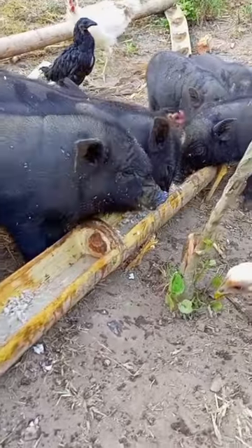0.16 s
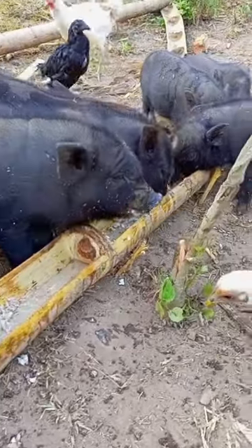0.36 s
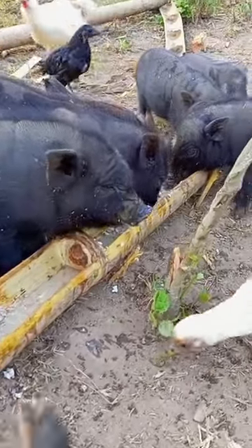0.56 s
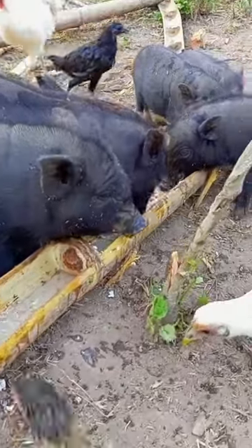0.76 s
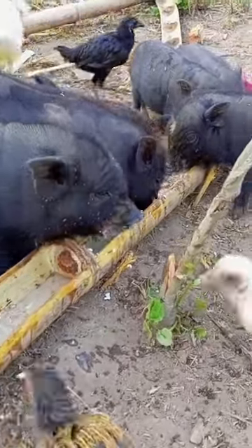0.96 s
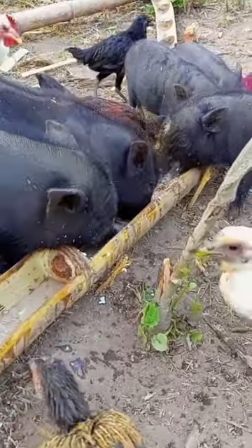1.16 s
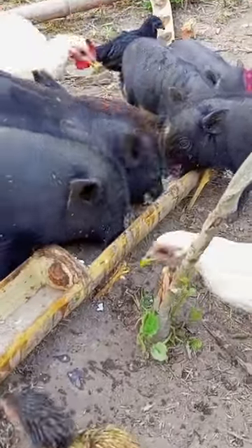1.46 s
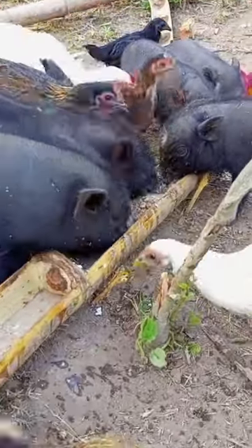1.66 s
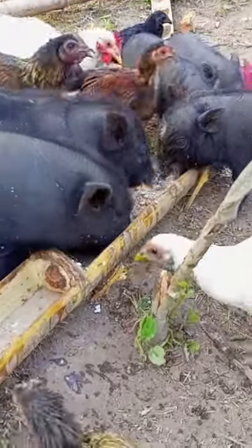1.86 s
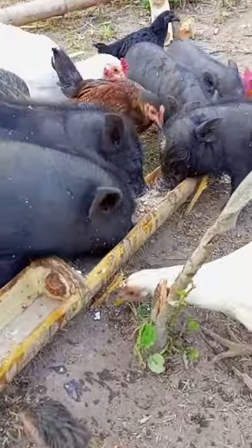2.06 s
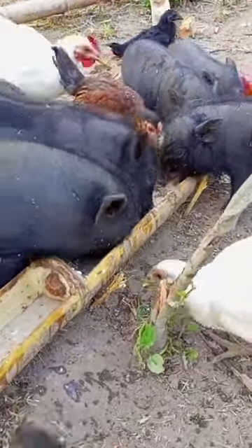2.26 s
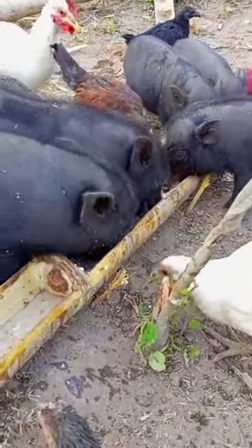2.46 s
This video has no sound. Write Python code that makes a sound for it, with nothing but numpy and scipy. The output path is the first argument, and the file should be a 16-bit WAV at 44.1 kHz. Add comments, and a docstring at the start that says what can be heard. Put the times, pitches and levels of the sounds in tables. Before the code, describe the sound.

Piglets chew wet feed close by in an open farmyard, with crisp lip smacks, squelches and small plops throughout. The sound dips briefly at 0.3 seconds. Snouts bump the bamboo trough now and then from 0.4 seconds, over a faint rumble. Hens call softly around 0.9 to 1.2 seconds. A soft grunt and snuffle come at 1.6, another snuffle at 2.2, and two faint distant tones near the end.

```python
"""Piglets eat wet feed from a bamboo trough in an open farmyard, a metre or two from the microphone.
Rustling and nibbling run throughout. Lips smack from the start, each smack a cluster of tiny bursting
films that ring the mouth and spray treble; tongues squelch and air pockets plop. The level dips briefly,
then snouts bump the trough and the sharpest smacks click over a faint rumble. Hens call softly; past
halfway come a grunt and two snuffles, and two faint tones carry from far off near the end."""
import sys
import numpy as np
from scipy import signal
from scipy.fft import rfft, irfft
from scipy.io import wavfile
from scipy.ndimage import uniform_filter1d

SR = 44100
rng = np.random.default_rng(int(sys.argv[2]) if len(sys.argv) > 2 else 0)


def unload_audio(sound):
    """Save the sound as a 16-bit wav file, at the path given as the first command line argument."""
    columns = np.transpose(np.atleast_2d(sound))
    # keep every value between -1 and 1, then stretch to whole-number steps
    steps = np.round(np.clip(columns, -1, 1) * 32767)
    wavfile.write(sys.argv[1], SR, steps.astype(np.int16))


N = 114660
T = np.arange(N) / SR
FILMS_PER_S = 2500  # wet films bursting in a mouthful

# Spectrum of spray and breath leaving a snout. Each row: frequency in Hz, relative level in dB.
SPRAY_COLOUR = [(900, -21.5), (2500, 7), (5000, 2), (10000, 4.5), (12000, -8), (15500, -20)]


def amp(db):
    """Decibels to gain."""
    return 10 ** (np.asarray(db) / 20)


def unit(x):
    """Scale to rms 1."""
    return x / np.sqrt(np.mean(x ** 2) + 1e-20)


def resonate(x, hz, q):
    """One resonance, gain 1 at its centre."""
    return signal.lfilter(*signal.iirpeak(min(hz, SR / 4), max(q, .5), fs=SR), x)


def colour(x, outline):
    """Minimum-phase filter with a (Hz, dB) outline, falling away below its first point."""
    hz, db = np.array(outline, float).T
    f = np.maximum(np.fft.rfftfreq(4096, 1 / SR), 1)
    octaves_below = np.maximum(np.log2(hz[0] / f), 0)
    gain_db = np.interp(np.log(f), np.log(hz), db) - 7.8 * octaves_below
    cepstrum = irfft(np.log(amp(gain_db)))
    half = len(cepstrum) // 2
    cepstrum[1:half] *= 2
    cepstrum[half + 1:] = 0
    return signal.fftconvolve(x, irfft(np.exp(rfft(cepstrum))))[:len(x)]


def walk(per_s):
    """Smooth random wander with a spread near 1."""
    return np.interp(T * per_s, np.arange(2000), rng.standard_normal(2000))


def gate(start, end, edge_s):
    """Fade in, hold, fade out."""
    return np.clip((T - start) / edge_s, 0, 1) * np.clip((end - T) / edge_s, 0, 1)


def fader(levels):
    """Gain that follows (seconds, dB) points."""
    return amp(np.interp(T, *np.array(levels).T))


def burst(length, per_s, spread_db=2):
    """Uneven clicks and a little noise swell and die away; returns them and their peak time."""
    peak = 2 * length
    t = np.arange(int(.25 * SR)) / SR - peak
    swell = np.exp(np.where(t < 0, -(t / (.55 * length)) ** 2, -t / (.5 * length)))
    chance, size, polarity = rng.random((3, len(t)))
    strength = amp(spread_db * np.minimum(-np.log(1 - size), 4))
    clicks = (chance < per_s / SR) * np.sign(polarity - .5) * strength
    return swell * (unit(clicks) + .34 * rng.standard_normal(len(t))), peak


def add(out, x, start, length, db):
    """Mix in a sound with the energy of level db held for its length."""
    i = max(int(start * SR), 0)
    x = x * amp(db) * np.sqrt(length * SR / (np.sum(x ** 2) + 1e-20))
    out[i:i + len(x)] += x[:max(N - i, 0)]


def hollow(events, q, skirt_q, lead_s, boost_db):
    """Soft pushes that each ring a damped hollow."""
    out = np.zeros(N)
    for at, length, hz, db in events:
        push, peak = burst(length, FILMS_PER_S)
        ring = resonate(push, hz, q)
        ring = resonate(resonate(ring, hz, skirt_q), hz, skirt_q)
        add(out, ring, at - peak - lead_s, length, db + boost_db)
    return out


def rooting(flutter_db=3):
    """Snouts and feet rustle low down and the mash slops above them, each fluttering in level."""
    # How loud the rustle and the slop are. Each row: time in seconds, level in dB.
    rustle_levels = [(0, -63.5), (.08, -67.5), (.2, -85), (.41, -84), (.46, -57.5), (.6, -81), (.66, -61.5),
                     (.79, -57), (.98, -67), (1.1, -63.5), (1.23, -68.5), (1.34, -79), (1.39, -66),
                     (1.6, -59), (1.78, -66), (1.85, -74), (1.9, -61.5), (2.0, -105), (2.07, -78),
                     (2.12, -61), (2.25, -57.5), (2.3, -75.5), (2.6, -80)]
    slop_levels = [(0, -74.5), (.2, -66), (.33, -75.5), (.45, -64), (.59, -86), (.68, -57.5), (.8, -68),
                   (1.02, -62.5), (1.11, -66.5), (1.21, -58), (1.33, -81), (1.39, -68.5), (1.6, -67),
                   (1.69, -58.5), (1.78, -63), (1.85, -76.5), (1.93, -64.5), (2.06, -79), (2.13, -57.5),
                   (2.29, -76), (2.36, -65), (2.6, -73.5)]
    # Their spectra. Each row: frequency in Hz, relative level in dB.
    rustle_colour = [(60, -9.5), (150, 2.5), (370, 7), (520, -2.5), (1000, -18)]
    slop_colour = [(250, -21.5), (450, -6.5), (650, 4.5), (1100, 9), (1600, -1), (3500, -21)]
    out = np.zeros(N)
    for levels, outline in ((rustle_levels, rustle_colour), (slop_levels, slop_colour)):
        noise = rng.standard_normal(N) * amp(flutter_db * walk(44.99))
        out += unit(colour(noise, outline)) * fader(levels)
    return out


def chewing(nibbles_per_s=95, nibble_s=.007, centre_hz=4000, spread_db=3.5, flutter_db=2, hiss_db=-3):
    """Quieter mouths: tiny wet nibbles, each with its own resonance, over a soft hiss."""
    # How loud the chewing is. Each row: time in seconds, level in dB.
    levels = [(0, -53), (.45, -55.5), (.58, -60.5), (.7, -55), (1.25, -57), (1.82, -53), (1.86, -61),
              (1.98, -53), (2.35, -54.5), (2.6, -58)]
    # Its spectrum. Each row: frequency in Hz, relative level in dB.
    outline = [(850, -38), (1250, -1), (2000, -2), (3100, 7), (4800, -3), (10000, 2.5), (12000, -5),
               (15500, -31)]
    nibbles = np.zeros(N)
    for at in np.arange(0, N / SR, 1 / nibbles_per_s):
        pitch, size, shift = np.clip(rng.standard_normal(3), -2, 2)
        films, _ = burst(nibble_s, 2 * FILMS_PER_S)
        wet = resonate(films, centre_hz * 2 ** (.75 * pitch), q=5)
        add(nibbles, wet, at + shift / nibbles_per_s, nibble_s, spread_db * size)
    hiss = unit(rng.standard_normal(N) * amp(flutter_db * walk(50)))
    mouths = unit(nibbles) + amp(hiss_db) * hiss
    return unit(colour(mouths, outline)) * fader(levels)


def smacks(open_q=1.9, open_db=-7.5, lead_s=.0005, mist_db=8.5, tint_db=13, spray_hz=(4500, 11000)):
    """Wet films burst between the lips: the mouth rings and a spray of sharp clicks escapes."""
    # Lip smacks. Each row: peak time and length in seconds, mouth resonance in Hz,
    # ring level and spray level in dB.
    lip_smacks = [(0.036, 0.0023, 3440, -42, -43.5), (0.118, 0.0045, 2460, -41, -52),
                  (0.137, 0.003, 3460, -34, -51.5), (0.234, 0.0016, 2450, -55.5, -49.5),
                  (0.257, 0.0076, 3300, -52.5, -58), (0.313, 0.0074, 3460, -42.5, -54),
                  (0.3524, 0.0016, 3280, -43, -50), (0.3616, 0.0046, 3250, -33, -44),
                  (0.384, 0.0098, 3080, -52, -52.5), (0.4054, 0.001, 3000, -40.5, -51),
                  (0.4375, 0.0075, 3660, -46.5, -58), (0.44, 0.0079, 2900, -46, -49.5),
                  (0.4648, 0.0031, 3130, -53, -38), (0.472, 0.0057, 3180, -35.5, -49.5),
                  (0.546, 0.0016, 3100, -47, -54), (0.5957, 0.0022, 4600, -76, -39.5),
                  (0.616, 0.005, 3000, -41.5, -44), (0.628, 0.008, 3060, -38.5, -45.5),
                  (0.656, 0.01, 2540, -43, -51), (0.694, 0.017, 3070, -46, -51.5),
                  (0.747, 0.0047, 3400, -41, -62), (0.756, 0.0087, 3240, -38, -46.5),
                  (0.768, 0.0092, 2630, -49, -54), (0.7917, 0.004, 3290, -31, -43),
                  (0.828, 0.0027, 5700, -34, -45), (0.832, 0.0068, 3200, -39, -42),
                  (0.84, 0.0042, 3430, -53, -31), (0.859, 0.0025, 3450, -38.5, -67),
                  (0.942, 0.008, 3600, -43, -78), (0.983, 0.011, 2870, -80, -46.5),
                  (1.0102, 0.0048, 3150, -44, -49), (1.03, 0.016, 3330, -41, -50),
                  (1.054, 0.0026, 3700, -47, -48), (1.069, 0.0024, 3180, -42, -53),
                  (1.0801, 0.0028, 3140, -31, -45.5), (1.0904, 0.0051, 2500, -40, -48.5),
                  (1.117, 0.0076, 3060, -56, -44.5), (1.141, 0.0041, 3000, -33.5, -47.5),
                  (1.1442, 0.0038, 3300, -33.5, -57), (1.231, 0.0042, 3320, -54, -49),
                  (1.369, 0.0089, 2160, -46, -41), (1.377, 0.0021, 3600, -33.5, -49),
                  (1.384, 0.0051, 2650, -41, -46.5), (1.4557, 0.0026, 2800, -41.5, -46),
                  (1.463, 0.0048, 3330, -41.5, -44.5), (1.4705, 0.0038, 2870, -35.5, -42),
                  (1.5265, 0.0035, 2245, -42.5, -79), (1.661, 0.0062, 2370, -44, -54),
                  (1.67, 0.008, 2920, -42, -47.5), (1.7174, 0.0018, 2780, -33, -40),
                  (1.758, 0.0064, 1950, -35, -49), (1.78, 0.0098, 4200, -63, -36.5),
                  (1.905, 0.006, 3085, -36.5, -40.5), (1.977, 0.012, 4200, -50, -52),
                  (2.092, 0.0026, 2570, -36.5, -40.5), (2.0983, 0.0024, 2570, -30.5, -38),
                  (2.107, 0.0074, 3070, -41, -47), (2.245, 0.0067, 2960, -43, -50),
                  (2.3144, 0.0039, 2880, -30.5, -68), (2.3163, 0.0027, 3430, -28.5, -69),
                  (2.323, 0.0096, 2720, -35, -47.5), (2.338, 0.026, 3340, -45.5, -46.5),
                  (2.4024, 0.0035, 3920, -37.5, -49.5), (2.433, 0.0088, 2680, -46, -41.5),
                  (2.597, 0.0056, 3000, -40.5, -46)]
    out = np.zeros(N)
    for at, length, hz, ring_db, spray_db in lip_smacks:
        films, peak = burst(length, FILMS_PER_S)
        open_mouth = resonate(resonate(films, hz, open_q), hz, open_q)
        ring = unit(resonate(open_mouth, hz, q=4.2)) + amp(open_db) * unit(open_mouth)
        add(out, ring, at - peak - lead_s, length, ring_db)
        envelope = np.sqrt(np.abs(uniform_filter1d(films ** 2, size=60)))
        mist = envelope * rng.standard_normal(len(films))
        # Every smack sprays with its own colour and two treble rings.
        tinted = [(f, db + tint_db * rng.uniform(-1.64, 1)) for f, db in SPRAY_COLOUR]
        drops = unit(films) + amp(mist_db) * unit(mist)
        treble_rings = sum(unit(resonate(drops, rng.uniform(*spray_hz), q=7)) for _ in range(2))
        spray = colour(unit(drops) + treble_rings / 2, tinted)
        add(out, spray, at - peak, length, spray_db)
    return out


def squelches():
    """Tongues press the mash and sound a broad, damped cavity."""
    # Each row: peak time and length in seconds, cavity pitch in Hz, level in dB before the boost.
    tongue_presses = [(0.1325, 0.0036, 840, -46.5), (0.6275, 0.0047, 836, -40), (0.701, 0.006, 1040, -48.5),
                      (0.77, 0.0069, 764, -46), (0.792, 0.0049, 1230, -48), (0.835, 0.011, 850, -46),
                      (1.072, 0.01, 790, -46.5), (1.187, 0.018, 490, -50), (1.375, 0.023, 670, -55.5),
                      (1.463, 0.018, 740, -54.5), (1.668, 0.022, 860, -53.5), (1.88, 0.0061, 880, -51.5),
                      (1.973, 0.014, 1240, -54), (2.108, 0.0062, 870, -44.5), (2.215, 0.011, 705, -51),
                      (2.326, 0.012, 730, -45.5)]
    return hollow(tongue_presses, q=.75, skirt_q=.71, lead_s=.00141, boost_db=2)


def plops():
    """Air pockets plop in the mash with a clear ring."""
    # Each row: peak time and length in seconds, pitch in Hz, level in dB before the boost.
    air_pockets = [(0.148, 0.0068, 1400, -53), (1.136, 0.0041, 1360, -53), (1.284, 0.0096, 865, -59.5),
                   (1.733, 0.011, 1450, -53.5), (1.744, 0.0074, 1400, -47), (1.905, 0.007, 910, -55.5),
                   (2.326, 0.0094, 915, -42), (2.438, 0.0073, 1220, -57.5), (2.494, 0.0078, 1410, -61)]
    return hollow(air_pockets, q=12.2, skirt_q=.5, lead_s=.00196, boost_db=5)


def rumble(hz=134, q=2.06, db=-74, fade_in_s=.3):
    """A low outdoor rumble fades in and stays."""
    low = resonate(resonate(rng.standard_normal(N), hz, q), hz, q)
    return unit(low) * amp(db) * np.minimum(T / fade_in_s, 1) ** 4


def bumps(top_hz=550):
    """Snouts and feet knock the trough, which answers with a dull thud."""
    # Each row: peak time and length in seconds, pitch in Hz, level in dB before boost and low-pass.
    knocks = [(0.4305, 0.0045, 278, -44), (0.443, 0.011, 304, -58), (0.49, 0.021, 162, -61),
              (0.755, 0.032, 340, -55), (0.795, 0.019, 360, -55), (1.075, 0.02, 90.5, -65.5),
              (1.08, 0.022, 280, -58.5), (1.781, 0.015, 243, -60.5)]
    thuds = hollow(knocks, q=.59, skirt_q=.73, lead_s=.0024, boost_db=5)
    return signal.sosfilt(signal.butter(4, TOP := top_hz, fs=SR, output="sos"), thuds)


def smack_top_clicks():
    """Crisp, very high clicks on top of the sharpest lip smacks."""
    # Each row: peak time and length in seconds, level in dB.
    sharp_smacks = [(0.624, 0.0032, -49), (0.771, 0.011, -54.5), (0.834, 0.019, -59), (1.024, 0.0052, -52),
                    (1.232, .002, -46), (1.972, 0.0051, -42.5)]
    # Spectrum of the clicks. Each row: frequency in Hz, relative level in dB.
    outline = [(5000, -29), (11500, 6), (15500, 1)]
    out = np.zeros(N)
    for at, length, db in sharp_smacks:
        clicks, peak = burst(length, FILMS_PER_S / 2)
        add(out, colour(clicks, outline), at - peak, length, db)
    return out


def hens(octave_db=-1, waver=.06, rough_db=4):
    """Hens call faintly: short, rough notes with their octave, scooping up, then holding or falling."""
    # Each row: start and end in seconds, first and last pitch of the glide in Hz, level in dB.
    calls = [(0.853, 0.91, 944, 944, -56), (0.901, 1.059, 425, 282, -58.5), (1.153, 1.181, 693, 630, -49),
             (1.182, 1.247, 419, 327, -57)]
    out = np.zeros(N)
    for start, end, first_hz, last_hz, db in calls:
        along = np.clip((T - start) / (end - start), 0, 1)
        scoop = 1 - .1 * np.exp(-along / .12)
        hz = (first_hz + (last_hz - first_hz) * along) * scoop
        phase = 2 * np.pi * np.cumsum(hz * (1 + waver * walk(200))) / SR
        note = (np.sin(phase) + amp(octave_db) * np.sin(2 * phase)) * amp(rough_db * walk(160))
        out += unit(note) * gate(start, end, (end - start) / 5) * amp(db)
    return out


def grunt(pulse_hz=79, throat_hz=110, chest_hz=300, db=-58):
    """A soft closed-mouth grunt: uneven slow pulses, muffled by throat and chest."""
    cycles = np.cumsum(pulse_hz * (1 + .0395 * walk(80))) / SR
    pulses = np.diff(np.floor(cycles), prepend=0)
    voice = resonate(resonate(pulses, throat_hz, q=1), chest_hz, q=.5)
    return unit(voice) * gate(start=1.55, end=1.655, edge_s=.038) * amp(db)


def snuffles():
    """Air hisses through a piglet's snout in the feed."""
    # Each row: start and end in seconds, centre of the hiss in Hz, level in dB.
    breaths = [(1.565, 1.699, 10700, -57), (2.111, 2.249, 4850, -49.5)]
    out = np.zeros(N)
    for start, end, hz, db in breaths:
        hiss = colour(resonate(rng.standard_normal(N), hz, q=4.8), SPRAY_COLOUR)
        out += unit(hiss) * gate(start, end, edge_s=.013) * amp(db)
    return out


def far_tones():
    """Faint, nearly steady tones carry from far off."""
    # Each row: start and end in seconds, pitch in Hz, level in dB.
    tones = [(1.96, 2.523, 1528, -72.5), (2.25, 2.587, 1216, -80)]
    return sum(unit(np.sin(2 * np.pi * hz * T + walk(17))) * gate(start, end, edge_s=.035) * amp(db)
               for start, end, hz, db in tones)


def yard(x, t60_s=.062, scatter_db=-10.5):
    """Faint short scatter from the trough, the ground and the animals follows the direct sound."""
    t = T[:SR // 3]
    tail = rng.standard_normal(len(t)) * amp(-60 * t / t60_s) * (t > .003)
    tail /= np.sqrt(np.sum(tail ** 2))
    return x + amp(scatter_db) * signal.fftconvolve(x, tail)[:N]


def scene():
    """The feeding piglets and the yard around them, at one microphone."""
    events = squelches() + plops() + bumps() + smacks() + smack_top_clicks() + hens() + grunt()
    return (yard(events) + snuffles() + rooting() + chewing() + rumble() + far_tones())[None]


def record(dry, dip_db=-32, top_hz=15800):
    """The level dips briefly once, early on, and the top is cut steeply."""
    dip = np.interp(T, (.254, .261, .3018, .3158), (0, 1, 1, 0))
    low_pass = signal.ellip(10, .2, 70, top_hz, fs=SR, output="sos")
    return signal.sosfilt(low_pass, dry * amp(dip_db * dip))


dry = scene()
out = record(dry)
unload_audio(out)
```